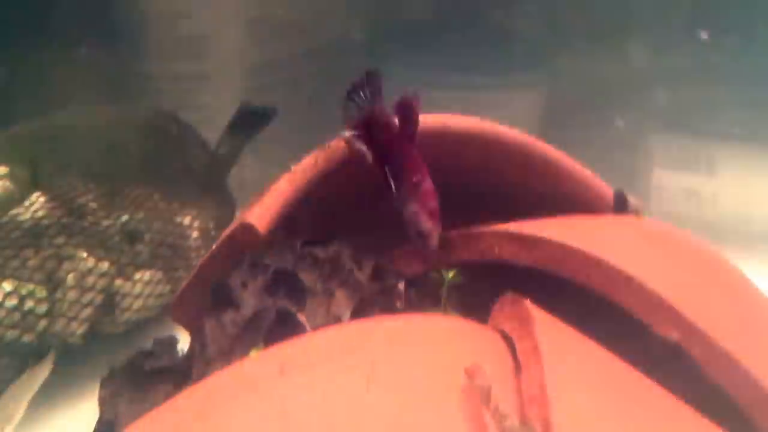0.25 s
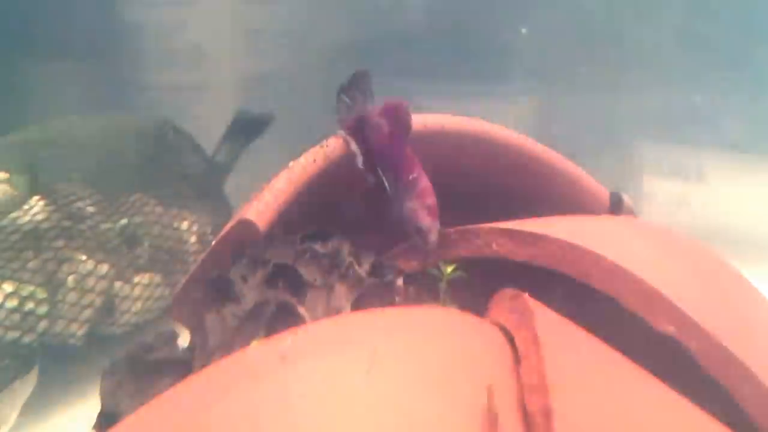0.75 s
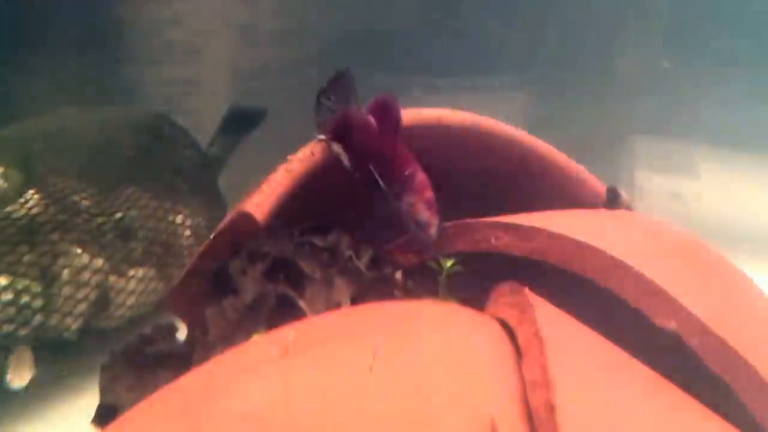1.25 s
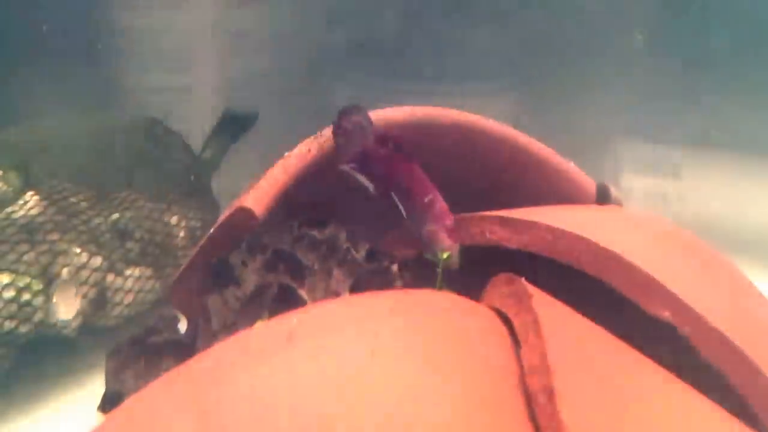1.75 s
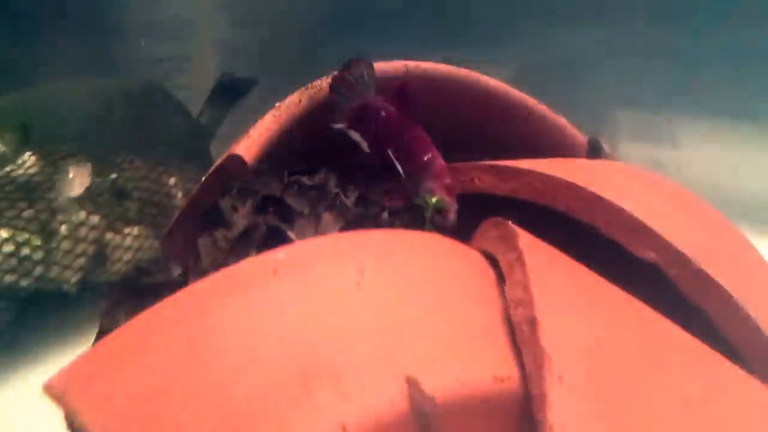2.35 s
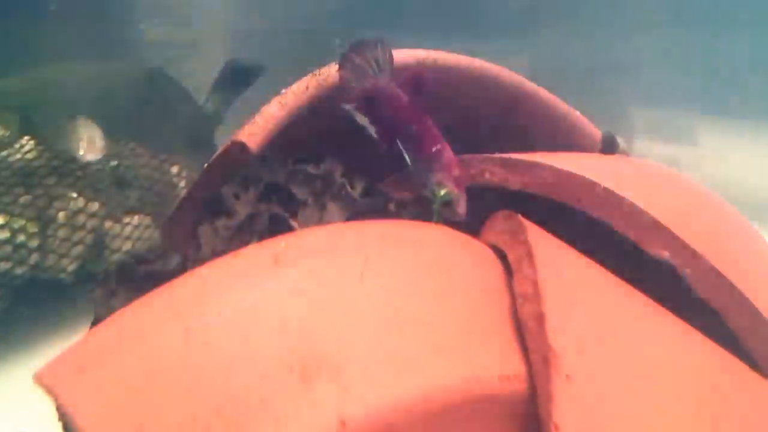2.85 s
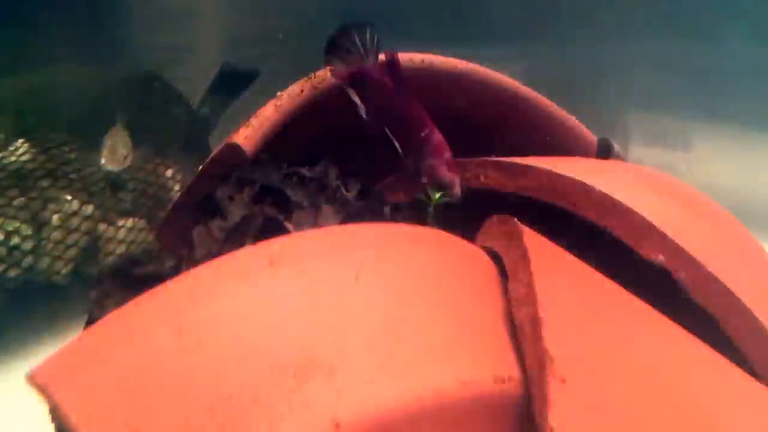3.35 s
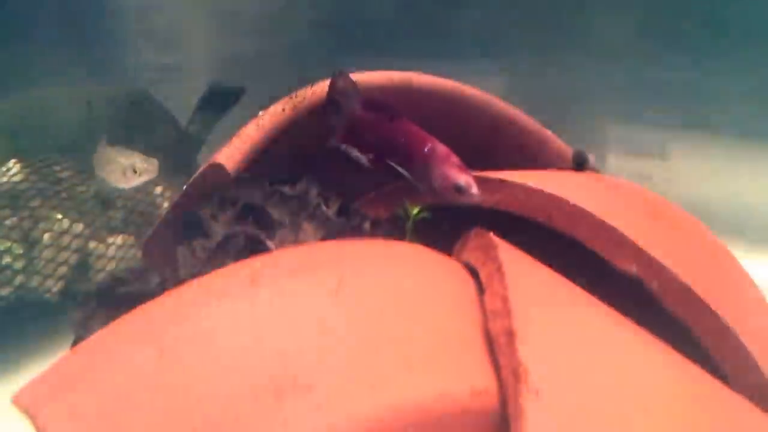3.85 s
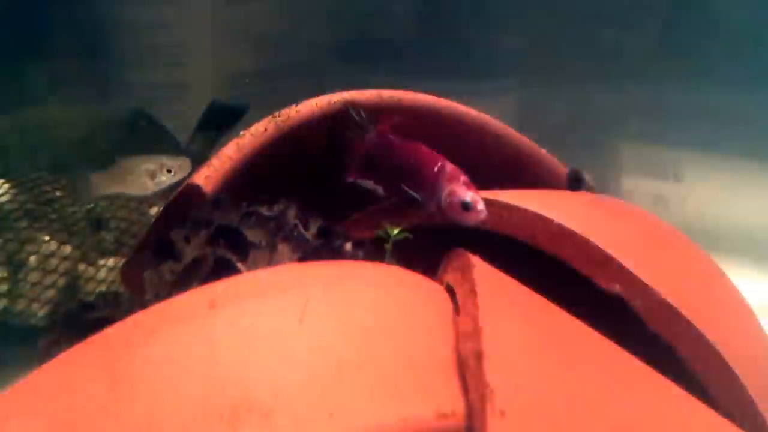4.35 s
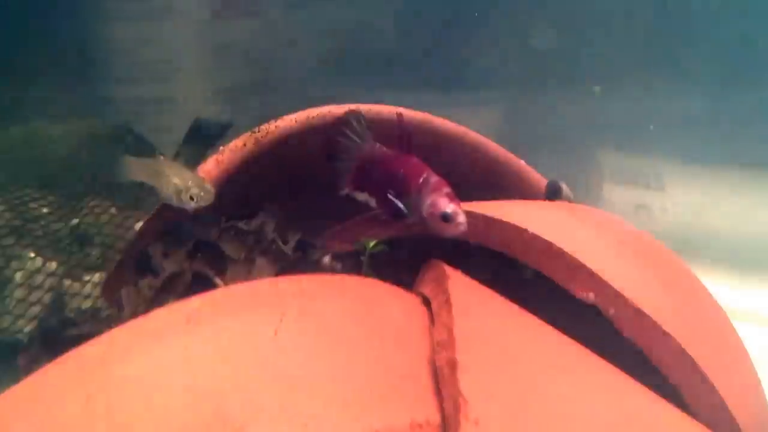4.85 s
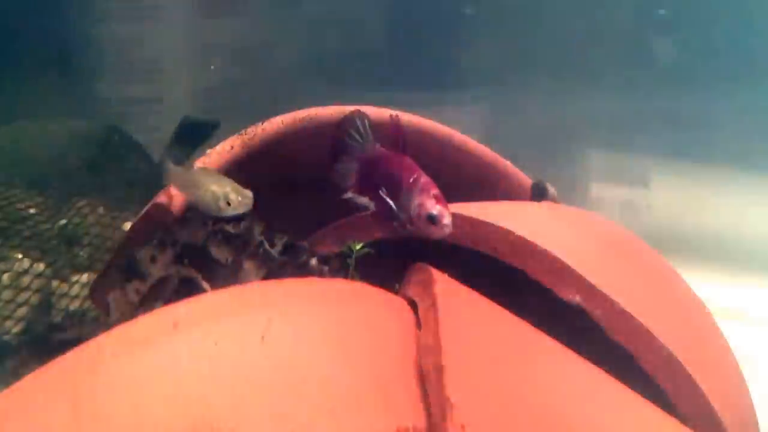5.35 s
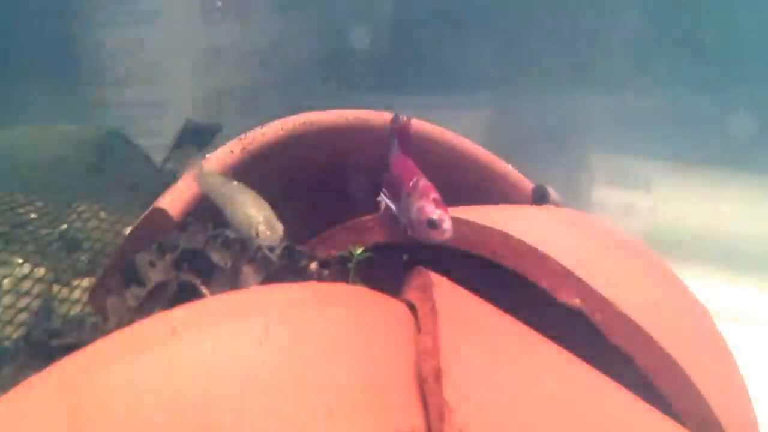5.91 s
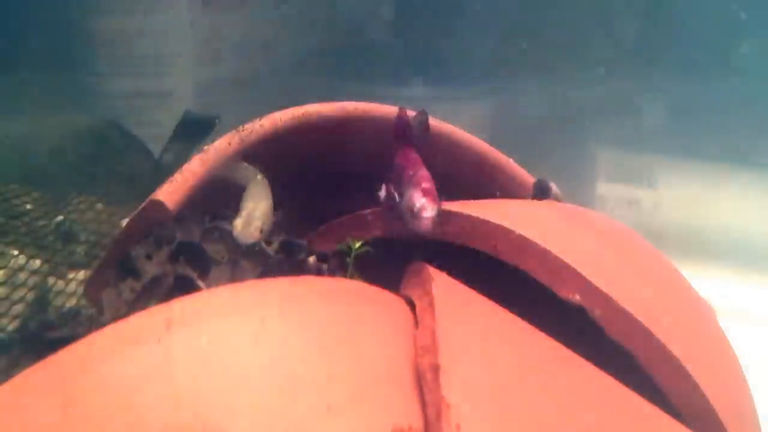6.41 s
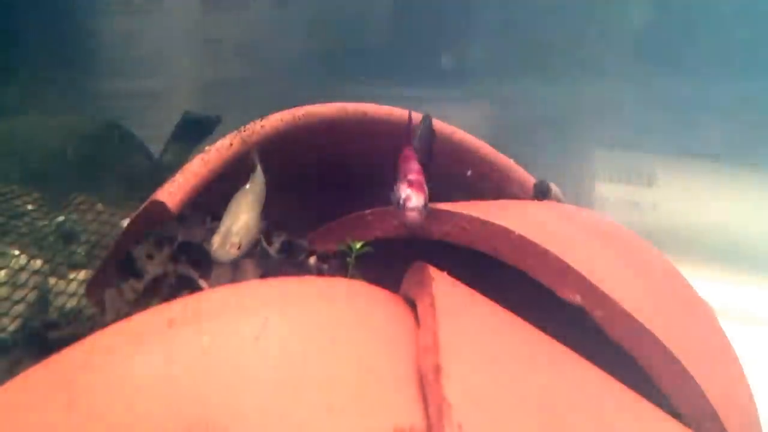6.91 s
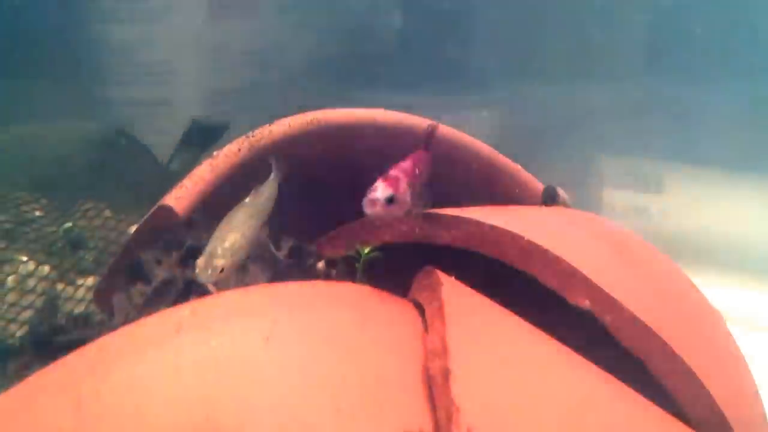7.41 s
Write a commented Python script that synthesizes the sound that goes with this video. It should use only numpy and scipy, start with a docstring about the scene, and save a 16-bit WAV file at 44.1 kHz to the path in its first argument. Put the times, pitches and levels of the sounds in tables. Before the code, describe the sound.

An aquarium air pump hums and buzzes steadily with a fluttering throb while bubbles gurgle, plop and fizz in the tank water.

```python
"""A mains-driven aquarium air pump hums beside a tank from start to end, one channel.
The hum is a harmonic series of the mains; the housing buzz, steady at first, throbs by 0.9 s, calms near 2.1 s,
throbs most from 2.4 to 5.4 s, calms near 6.2 s and throbs again at the end. Filtered noise makes the air's rumble,
which slowly weakens, the wash, and the fizz at the surface, which grows. Decaying sines of rising pitch make
bubbles from 0.1 s on, bursts of spray from 0.2 s and glugs near 0.5, 1.7, 1.95, 5 and 5.5 s."""
import sys
import numpy as np
from scipy import signal
from scipy.fft import rfft, irfft
from scipy.io import wavfile

SR = 44100
rng = np.random.default_rng(int(sys.argv[2]) if len(sys.argv) > 2 else 0)


def rack_gain(trim_db):
    """Turn a fader trim in dB into the linear factor to multiply a signal by."""
    fader = np.asarray(trim_db, float)
    return 10 ** (fader / 20)


def wav_record(signal):
    """Record a signal, one row per channel, as 16-bit PCM in the file named by sys.argv[1]."""
    frames = np.transpose(np.atleast_2d(signal))
    bounded = np.clip(frames, -1, 1)
    # unit amplitude maps onto the largest positive 16-bit level
    quanta = np.round(bounded * 32767).astype(np.int16)
    wavfile.write(sys.argv[1], SR, quanta)


N = 338247
MAINS_HZ = 59.995

# spectrum of air rumbling out under water: f/Hz, relative level/dB
RUMBLE_SPECTRUM = [(30, -15), (60, -6), (100, -3), (140, -5), (200, -0.5), (240, -4), (270, -1.5),
                   (330, -6), (400, -15), (450, -19.5), (560, -19.5), (700, -28), (1000, -35.5)]
# spectrum of moving water through the glass: f/Hz, relative level/dB
WASH_SPECTRUM = [(450, -14), (700, -10), (850, -6), (1100, 0.5), (1400, -0.5), (1800, -4), (2500, -9.5),
                 (3000, -7.5), (3400, -13.5), (3700, -14.5), (4400, -11), (5850, -14.5), (6200, -21.5),
                 (7200, -23.5)]
# spectrum of fine fizz at the surface: f/Hz, relative level/dB
FIZZ_SPECTRUM = [(3880, -28), (6600, -2), (7300, -3), (7820, -6), (8720, 1.5), (10300, -3), (11100, -0.5),
                 (13300, -1), (15600, -3)]


def pump(t):
    """Forced vibration: hum and buzz are mains harmonics; a slow beat modulates the buzz in strength and phase."""
    # diaphragm hum: multiple of mains, mean level/dB rms
    hum_partials = [(1, -32.5), (2, -33.5), (3, -45.5), (4, -52), (5, -54), (6, -52), (7, -69), (8, -61.5),
                    (9, -75), (10, -58), (11, -71), (14, -77), (15, -70), (16, -74), (17, -68), (18, -83),
                    (20, -62), (21, -71.5), (23, -78), (24, -93.5), (25, -67.5), (26, -73), (27, -72),
                    (28, -65), (29, -73), (30, -72), (31, -75), (32, -91), (33, -71), (34, -71.5),
                    (35, -83), (36, -73)]
    # housing buzz: multiple of mains, mean level/dB rms before throb and trim
    buzz_partials = [(37, -89), (38, -77), (41, -76), (42, -78), (44, -82), (46, -77.5), (47, -86),
                     (48, -73.5), (49, -75), (51, -74.5), (52, -78), (75, -74), (78, -86), (79, -69.5),
                     (80, -83), (83, -80), (84, -78), (85, -70), (86, -79), (87, -69.5), (88, -76),
                     (89, -76.5), (90, -78.5), (91, -78), (92, -72.5), (93, -88), (94, -70), (95, -84),
                     (96, -80.5), (97, -72.5), (98, -84.5)]
    # looseness of the housing: t/s, mean depth of the buzz throb (0-1)
    looseness = [(0, 0), (.9, .35), (2.1, 0.14), (2.4, 0.7), (3.5, .65), (4.7, .45), (5.4, 0.7), (6.2, 0.1),
                 (7.67, 0.6)]
    first_stroke_s = -0.001811
    throb_hz, throb_peak_s, throb_hz_per_s = 6.316, .0466, .032
    wander_db, wander_hz = 2.5, .12
    buzz_trim_db, rattle_db = -0.5, -64

    turn = 2 * np.pi * MAINS_HZ * (t - first_stroke_s)
    hum, buzz = np.zeros(N), np.zeros(N)
    for k, db in hum_partials:
        if k < 4:
            # the lowest multiples line up into one sharp return stroke, the third leading by 0.9 rad
            phase = np.pi * (k - 1) + .9 * (k == 3)
        else:
            phase = rng.uniform(0, 2 * np.pi)
        hum += rack_gain(db) * np.cos(k * turn + phase)

    beat_cycles = throb_hz * (t - throb_peak_s) + throb_hz_per_s * t ** 2 / 2
    beat = 2 * np.pi * beat_cycles + .1 * drift(1.5)
    depth = np.clip(np.interp(t, *np.transpose(looseness)) + 0.24 * drift(2.9), 0, 1)
    throb = depth * np.cos(beat)
    shaken_turn = turn + .008 * np.sin(beat)  # rad
    for k, db in buzz_partials:
        share = 1 if k > 60 else .25  # the high multiples throb most
        # each multiple comes and goes slowly on its own
        wander = wander_db * np.sin(2 * np.pi * (wander_hz * t + rng.random()))
        level = rack_gain(db + wander) * (1 + 0.15 * drift(1.5))
        buzz += level * (1 + share * throb) * np.cos(k * shaken_turn + rng.uniform(0, 2 * np.pi))

    # the loose part never repeats exactly: noise in the housing resonance, throbbing along
    housing = signal.butter(3, [4400, 5900], "band", fs=SR, output="sos")
    noise = rms_one(signal.sosfilt(housing, rng.standard_normal(N)))
    rattle = rack_gain(rattle_db + 2.7 * drift(16.0)) * (1 + throb / 2) * noise
    tones = hum * rack_gain(0.43 * drift(2.2)) + buzz * rack_gain(buzz_trim_db)
    return rattle + np.sqrt(2) * tones  # sqrt(2) turns rms into peak amplitude


def rumble(t):
    """Amplitude modulation: turbulent air leaves the outlet in puffs, a little stronger on each stroke."""
    level_db = -39.5 - 0.1248 * t  # the air shifts slowly from the deep outlet to the surface
    puffs = 1 + 0.13 * np.cos(2 * np.pi * MAINS_HZ * (t - .004))
    return puffs * hiss(np.geomspace(25, 1100, 9), RUMBLE_SPECTRUM, level_db, patchy_db=1.8, shared_db=.7)


def bubbles(count=4):
    """Damped bubble resonance: clear bubbles with weaker companions, deep ones swooping up, high ones as pips."""
    # clear single bubbles: onset t/s, envelope peak level/dB, middle f/Hz
    clear_bubbles = [(0.116, -49, 1000), (0.222, -47, 5880), (0.311, -48, 1335), (0.519, -47, 796),
                     (0.589, -42, 1440), (0.719, -48, 2770), (0.731, -44, 1104), (1.117, -49, 954),
                     (1.695, -47, 780), (1.765, -42, 846), (1.979, -46, 835), (2.04, -50, 956),
                     (2.075, -47, 974), (2.266, -46, 1140), (2.769, -48, 1040), (3.163, -43, 1110),
                     (3.396, -47, 2120), (3.645, -44, 1300), (3.776, -49, 2730), (4.226, -50, 4060),
                     (4.452, -52, 4200), (4.763, -42, 1090), (5.085, -45, 1750), (5.091, -48, 900),
                     (5.474, -50, 900), (5.584, -49, 1800), (5.866, -50, 840), (6.002, -44, 1840),
                     (6.699, -50, 890), (6.725, -48, 2300), (7.053, -49, 850), (7.183, -52, 3316),
                     (7.294, -52, 766), (7.326, -54, 3290), (7.398, -52, 3300), (7.474, -49, 818)]
    out = np.zeros(N)
    companions = rng.uniform(-1, 1, (len(clear_bubbles), count, 3))
    for (s, db, hz), draws in zip(clear_bubbles, companions):
        deep = min(900 / hz, 1)
        add(out, s, rack_gain(db) * plink(hz, cycles=6 + hz / 280, rise_hz=70 * deep, swell_s=.005))
        for late, scatter, size in draws:
            near_hz = hz + 220 * deep * late + 140 * scatter
            companion = plink(near_hz, cycles=4 + hz / 250, rise_hz=70 * deep, swell_s=.004)
            add(out, s + .025 * late, rack_gain(db - 11 + 3 * size) * companion)
    return out


def glugs():
    """Rising resonance: a big bubble rings long and sweeps up widely as it nears the surface."""
    # big bubbles: onset t/s, envelope peak level/dB, middle f/Hz
    big_bubbles = [(.49, -48.5, 616), (1.73, -43.5, 464), (1.95, -50, 564), (4.96, -46, 431),
                   (5.45, -51, 557)]
    out = np.zeros(N)
    for s, db, hz in big_bubbles:
        # the pitch climbs by a quarter of its middle value per decay time
        add(out, s, rack_gain(db) * plink(hz, cycles=11, rise_hz=.25 * hz, swell_s=0.027))
    return out


def spray(count=32):
    """Superposition: each burst is a shower of small bubbles and droplets spread in time and pitch."""
    # bursts at the surface: start t/s, reference level/dB (each droplet lies 6-12 dB below),
    # nominal lowest f/Hz (pitches spread 6 % below it), highest f/Hz
    bursts = [(0.217, -65, 7450, 9600), (0.54, -51, 890, 1780), (0.641, -65, 8300, 8700),
              (0.72, -46, 916, 1390), (0.786, -63, 9800, 15000), (1.489, -63, 9100, 12300),
              (1.657, -64, 9400, 12000), (2.145, -66, 7200, 7500), (2.841, -61, 7400, 10900),
              (3.189, -61, 8400, 13600), (3.407, -63, 10400, 14800), (3.927, -64, 8400, 12300),
              (4.182, -62, 9900, 11300), (4.24, -56, 3960, 4500), (4.408, -61, 7600, 13400),
              (4.655, -59.5, 8400, 13200), (4.76, -49, 790, 1410), (4.974, -62, 8800, 10800),
              (5.085, -44, 1090, 2190), (5.29, -53.5, 3050, 3270), (5.332, -59, 7200, 14300),
              (5.584, -57.5, 7200, 10100), (5.88, -64, 7900, 11900), (6.04, -65, 9600, 11300),
              (6.3, -48.5, 1510, 2290), (6.53, -65, 9500, 10100), (6.832, -61, 8400, 13400),
              (7.183, -67, 8900, 11300), (7.381, -65, 12000, 14900), (7.491, -59, 7400, 10300)]
    out = np.zeros(N)
    for (s, db, low_hz, high_hz), draws in zip(bursts, rng.random((len(bursts), count, 3))):
        for late, pitch, size in draws:
            hz = .94 * low_hz + pitch * (high_hz - .94 * low_hz)
            droplet = plink(hz, cycles=4 + hz / 270, rise_hz=60, swell_s=.002)
            add(out, s + .06 * late, rack_gain(db - 12 + 6 * size) * droplet)
    return out


def lumps():
    """Low bubble resonances: single large bubbles at random times follow the colour of the rumble."""
    return crowd(per_s=40, low_hz=151.1, high_hz=447.5, level_db=-42.5, colour=RUMBLE_SPECTRUM, count=1)


def gurgle():
    """Superposed resonances: faint bubbles in pairs follow the colour of the wash."""
    return crowd(per_s=160, low_hz=417, high_hz=6526, level_db=-58.0, colour=WASH_SPECTRUM, count=2)


def droplets():
    """High resonances of tiny bubbles: clumps of four follow the colour of the fizz."""
    return crowd(per_s=220, low_hz=6560, high_hz=14800, level_db=-80.5, colour=FIZZ_SPECTRUM, count=4)


def wash():
    """Broadband flow noise: moving water heard through the glass."""
    return hiss(np.geomspace(420, 7400, 12), WASH_SPECTRUM, -52, patchy_db=2.0, shared_db=.3)


def fizz(t):
    """High-frequency noise: fine fizz at the surface grows as the air shifts there."""
    level_db = -69.5 + 0.37 * t
    return hiss(np.geomspace(6400, 16500, 10), FIZZ_SPECTRUM, level_db, patchy_db=1.8, shared_db=.8)


def tank(x):
    """Reverberation: glass walls return a dense, short, exponentially decaying tail."""
    t60_s, tail_db = .1, -6
    t = np.arange(int(.3 * SR)) / SR
    tail = rng.standard_normal(len(t)) * rack_gain(-60 * t / t60_s) * (t > .002)
    return x + rack_gain(tail_db) * signal.fftconvolve(x, tail / np.linalg.norm(tail))[:N]


def plink(hz, cycles, rise_hz, swell_s):
    """Damped oscillator: a bubble swells in, rings unevenly and climbs by rise_hz per decay time."""
    decay_s = cycles / hz
    t = np.arange(int(5 * decay_s * SR)) / SR
    shape = (1 - np.exp(-t / swell_s)) * np.exp(-t / decay_s)
    wobble = 1 + .5 * np.sin(2 * np.pi * (rng.uniform(75, 157.4) * t + rng.random()))
    pitch = hz + rise_hz * (t / decay_s - .7)
    return shape / shape.max() * wobble * np.sin(2 * np.pi * np.cumsum(pitch) / SR)


def crowd(per_s, low_hz, high_hz, level_db, colour, count):
    """Random superposition: faint bubbles in clumps of count, some standing out, coloured by a spectrum."""
    out = np.zeros(N)
    clumps = int(per_s * N / SR / count)
    for when, pitch, size in rng.random((clumps, 3)):
        for late, scatter in rng.uniform(-1, 1, (count, 2)):
            hz = low_hz * (high_hz / low_hz) ** pitch * (1 + .03 * scatter)
            db = level_db + 11 * size ** 2 + np.interp(hz, *np.transpose(colour))
            bubble = plink(hz, cycles=4 + hz / 180, rise_hz=50, swell_s=.004)
            add(out, when * N / SR + .025 * late, rack_gain(db) * bubble)
    return out


def hiss(edges, spectrum, level_db, patchy_db, shared_db):
    """Turbulence noise in narrow bands: each swells on its own and a little with the rest."""
    out = np.zeros(N)
    white = rng.standard_normal((2, N))  # neighbouring bands take different noises
    together = drift(7.0)
    for k, (low, high) in enumerate(zip(edges, edges[1:])):
        band_pass = signal.butter(2, [low, high], "band", fs=SR, output="sos")
        out += signal.sosfilt(band_pass, white[k % 2]) * rack_gain(patchy_db * drift(12.0))
    return rack_gain(level_db + shared_db * together) * rms_one(coloured(out, spectrum))


def coloured(x, spectrum):
    """Linear filtering: weight the spectrum by (f/Hz, level/dB) points on a log frequency axis."""
    hz, db = np.transpose(spectrum)
    bins = np.maximum(np.fft.rfftfreq(N, 1 / SR), 1)
    gain_db = np.interp(np.log(bins), np.log(hz), db, left=-90)
    return irfft(rfft(x) * rack_gain(gain_db), N)


def drift(rate):
    """Low-passed chance: noise through two one-pole filters with corners at rate in Hz, rms 1."""
    step = 40  # samples between drawn points
    r = np.exp(-2 * np.pi * rate * step / SR)
    noise = rng.standard_normal(N // step + 2002)
    slow = signal.lfilter([1], [1, -2 * r, r * r], noise)[2000:]  # drop the filter's run-in
    return np.interp(np.arange(N) / step, np.arange(len(slow)), rms_one(slow))


def rms_one(x):
    """Normalisation of mean power: scale to rms 1."""
    return x / np.sqrt(np.mean(x ** 2) + 1e-20)


def add(out, s, sound):
    """Linear superposition: lay a short sound in at s seconds."""
    i = int(np.clip(s * SR, 0, N))
    out[i:i + len(sound)] += sound[:N - i]


def scene():
    """Pressures add at one point; bubbles and droplets also ring in the tank."""
    t = np.arange(N) / SR
    events = tank(bubbles() + glugs() + spray() + lumps() + gurgle() + droplets())
    return (pump(t) + rumble(t) + wash() + fizz(t) + events)[None]


def band_limit(x):
    """A steep low-pass at the top of the band."""
    return signal.sosfilt(signal.butter(12, 15800, fs=SR, output="sos"), x)


def record(dry):
    """The one-channel sum of all pressures is the finished mix."""
    return band_limit(dry)


dry = scene()
out = record(dry)
wav_record(out)
```